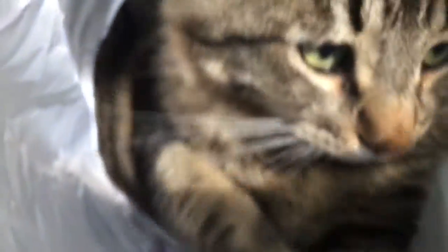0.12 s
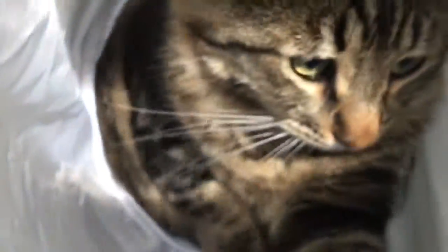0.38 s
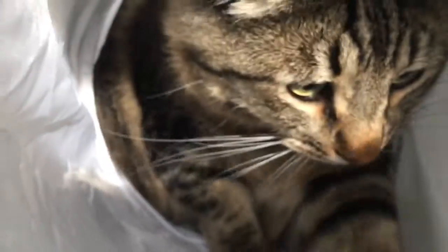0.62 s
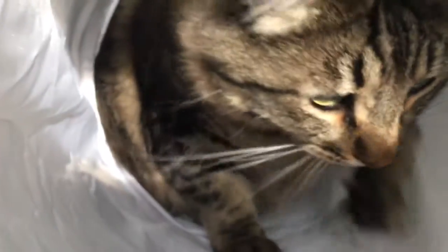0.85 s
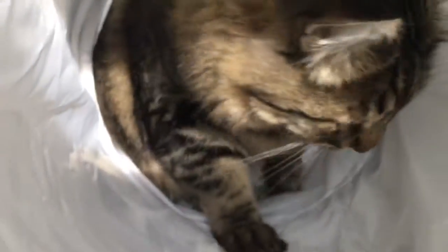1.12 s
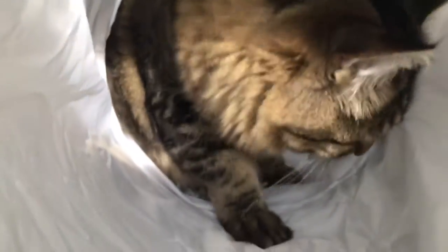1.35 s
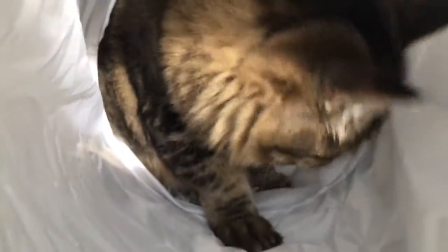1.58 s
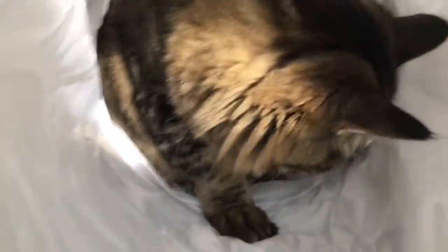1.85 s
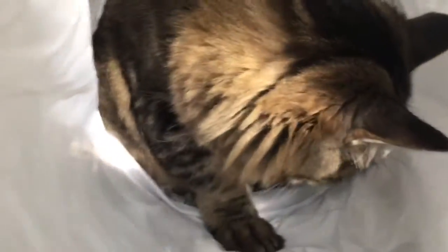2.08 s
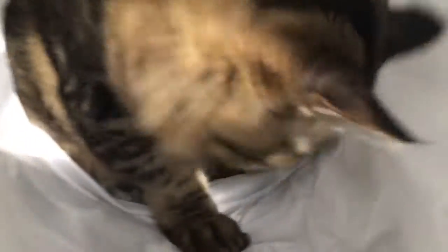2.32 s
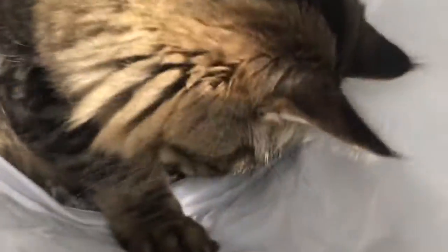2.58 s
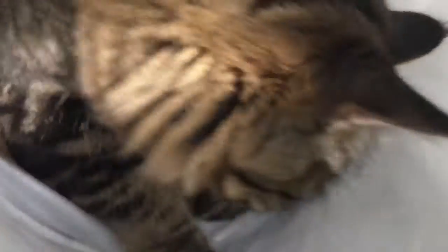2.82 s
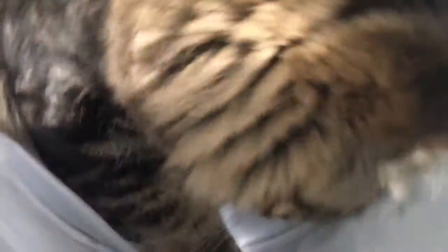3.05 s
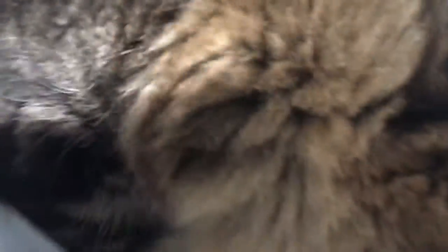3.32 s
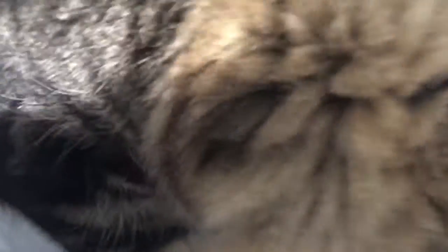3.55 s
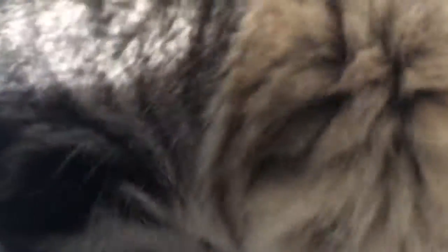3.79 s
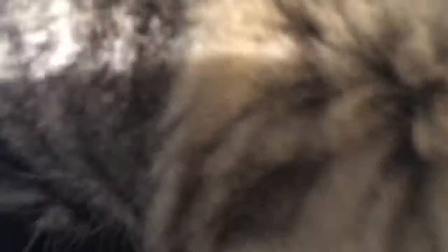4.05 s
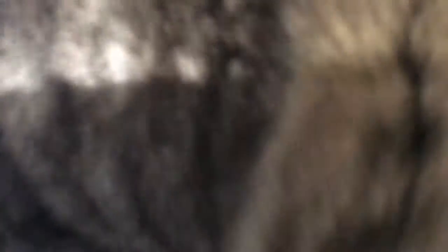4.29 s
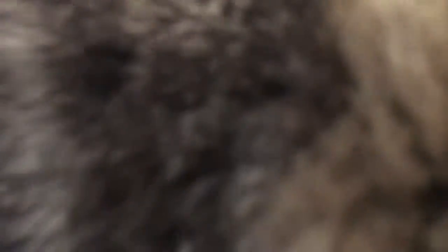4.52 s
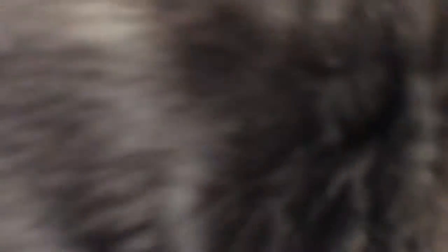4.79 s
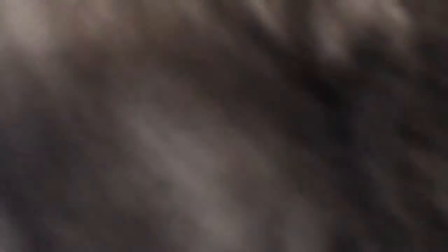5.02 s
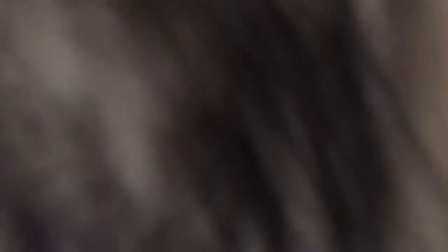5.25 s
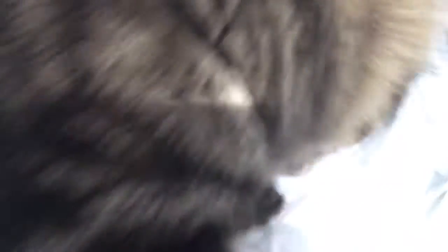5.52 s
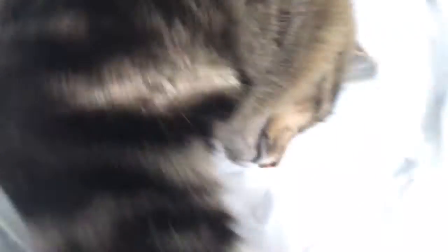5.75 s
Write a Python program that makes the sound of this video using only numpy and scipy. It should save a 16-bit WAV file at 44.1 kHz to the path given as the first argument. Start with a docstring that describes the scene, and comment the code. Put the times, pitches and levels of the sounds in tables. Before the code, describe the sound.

A cat moves inside a crinkly fabric tunnel in a quiet home, very close to a handheld phone. Crisp snaps and rustling come first, thin out to faint ticks after a second, return gently, then build into dense scraping, muffled rubbing and low thumps as the cat pushes past the microphone, with the hardest knocks near the end.

```python
"""Stiff film in a crinkly fabric tunnel snaps and crackles as a cat shifts a hand's width from a phone.
The cat then pushes past and brushes against the phone. Snaps are short bursts of filtered noise;
crackle, scrape and drag are noise gated by many small slips; a taut fold squeaks on a rising sine.
Bumps are damped low sines in the phone's body; filtered noise makes the handling rumble and the quiet home."""
import sys
import numpy as np
from scipy import signal
from scipy.fft import rfft, irfft
from scipy.io import wavfile
from scipy.ndimage import uniform_filter1d

SR = 44100
rng = np.random.default_rng(int(sys.argv[2]) if len(sys.argv) > 2 else 0)


def ratio(d):
    """dB to gain"""
    e = np.asarray(d, float) / 20
    return 10 ** e


def digitize_waveform(pressure):
    """Quantize a signal to 16-bit integers and store it at the path in sys.argv[1].

    Rows of a 2-D input are taken as channels; values are limited to [-1, 1].
    """
    field = np.atleast_2d(pressure).T
    bounded = np.clip(field, -1, 1)
    quanta = np.round(bounded * 32767).astype(np.int16)
    wavfile.write(sys.argv[1], SR, quanta)


N = 259308
GRAIN = 4096  # samples of noise for one snap

# tone of the quiet home: pitch_hz, relative_level_db
HOME_SPECTRUM = [(20, -23), (65, -1), (118, -3.5), (182, 6.5), (232, -4), (350, -3), (450, -28), (750, -19),
                 (5000, -38), (7500, -45), (16000, -52)]
# tone of the phone's handling rumble: pitch_hz, relative_level_db
RUMBLE_SPECTRUM = [(18, -32.5), (36, -10), (70, 0), (115, -5.5), (170, -9), (260, -9), (400, -15.5),
                   (900, -49.5)]
# tone of fur and cloth dragging: pitch_hz, relative_level_db
DRAG_SPECTRUM = [(200, -1.5), (400, -2), (1000, -0.5), (1600, -12), (3500, -40)]
# tone of taut cloth scraping: pitch_hz, relative_level_db
SCRAPE_SPECTRUM = [(800, -17), (1500, 5.5), (2200, 4), (4500, -1.5), (5400, -16)]
# tone of the stiff film: pitch_hz, relative_level_db
FILM_SPECTRUM = [(400, -10.5), (2000, 0), (6800, -1), (15500, -2)]
# response of the phone's microphone port, uneven in the treble and cut at the top: pitch_hz, gain_db
PORT_RESPONSE = [(3900, 0), (4850, 0.5), (5900, 3.5), (9300, 1.5), (10400, -1), (11800, 1), (15800, -2.5),
                 (16000, -32)]
# each shift of paw or flank, with the time to rise and to fall 20 dB:
# peak_s, rise_s, fall_s, crackle_db, scrape_db, drag_db
CAT_SHIFTS = [(0.0, .05, .2, -48, -46.5, -45), (.13, .03, .1, -54, -54, -48),
              (.355, .09, .035, -49, -44, -45), (.529, .22, .05, -39, -47.5, -41),
              (.633, .17, .06, -40, -50, -42.5), (.718, .08, .02, -56, -45.5, -49),
              (.903, .025, .022, -49, -51, -47), (.963, .04, .022, -60, -58, -47),
              (1.112, .04, .05, -64, -65, -63), (1.35, .5, .15, -76, -74, -64),
              (2.429, .1, .3, -68, -62, -59), (2.536, .1, .03, -45, -57, -51.5),
              (2.67, .015, .5, -75, -67, -62), (2.83, .07, .2, -54, -50, -57),
              (2.875, .15, .045, -51, -52, -56), (2.998, .008, .2, -53, -52, -50.5),
              (3.038, .1, .08, -60, -48, -52), (3.135, .1, .025, -57, -50, -49),
              (3.218, .1, .03, -70, -55, -60), (3.43, .09, .045, -56, -45, -48),
              (3.53, .15, .08, -67, -59, -56), (3.66, .04, .2, -74, -58, -53),
              (3.725, .04, .25, -51, -44, -46), (3.83, .08, .04, -52, -46, -41),
              (3.918, .08, .04, -50, -40, -46), (4.031, .17, .06, -52, -47, -40.5),
              (4.13, .1, .1, -61, -54, -54), (4.335, .05, .03, -59, -48.5, -50),
              (4.388, .003, .2, -54, -48, -40), (4.421, .04, .035, -34, -37.5, -38),
              (4.48, .15, .07, -47, -40, -32), (4.58, .2, .1, -62, -46, -46),
              (4.71, .025, .15, -48.5, -48, -38), (4.85, .15, .08, -42, -35, -30),
              (5.03, .2, .1, -41, -42, -35), (5.083, .012, .18, -27, -32, -24.5),
              (5.243, .3, .16, -32.5, -35, -27.5), (5.37, .08, .08, -42, -50, -34),
              (5.507, .03, .025, -34.5, -48, -31), (5.592, .05, .15, -40.5, -46, -36),
              (5.77, .14, .3, -39, -33, -35), (5.877, .3, .1, -39, -40, -38)]
# between the shifts, with the rumble that a shift adds relative to its drag:
# start_s, settling_cloth_db, hand_rumble_db, rumble_above_drag_db
CAT_UNREST = [(0, -63, -46, -1), (.22, -70, -46, -1), (.45, -62, -48, -1), (.7, -62, -48, -2),
              (.8, -67, -56, 0), (1.0, -70, -54, 0), (1.45, -77, -60, 0), (1.78, -83, -64, 0),
              (2.15, -80, -55, 0), (2.62, -88, -60, 6), (3.0, -80, -58, 3), (3.4, -70, -49, 0),
              (3.6, -84, -60, 3), (3.8, -60, -42, 2), (4.05, -62, -46, 2), (4.2, -68, -60, 4),
              (4.45, -70, -50, 9), (4.65, -70, -54, 0), (5.0, -52, -40, 3), (5.4, -44, -36, -2),
              (5.62, -52, -30, 3), (5.88, -50, -48, -3)]
# settling cloth, one value each for crackle, scrape and drag: relative_level_db
SETTLING_MIX = [-3, -1, 1]
# bumps against the phone, level before damping: start_s, level_db, pitch_hz
PHONE_BUMPS = [(0.041, -33, 150), (0.142, -33, 153), (0.29, -31, 170), (0.972, -32, 147), (1.698, -44, 170),
               (3.031, -31, 152), (3.21, -34, 72.6), (3.684, -25, 267), (3.73, -27.5, 248),
               (3.781, -23, 120), (3.809, -26.5, 202), (3.91, -21, 113), (3.999, -21, 112),
               (4.034, -25, 189), (4.297, -30.5, 136), (4.397, -21.5, 200), (4.446, -19.5, 108),
               (4.464, -21, 227), (4.492, -18, 153), (4.699, -30, 210), (4.868, -15.5, 179),
               (5.047, -21, 198), (5.066, -16, 150), (5.078, -13, 120), (5.09, -11, 95), (5.108, -12, 62),
               (5.383, -18, 260), (5.501, -11, 167), (5.509, -3.5, 73), (5.498, -11, 600),
               (5.577, -14, 100), (5.578, -4, 720), (5.651, -17.5, 110), (5.802, -16.5, 208)]
# a fold squeaks upward as it is pulled tight: time_s, pitch_hz, level_db
FOLD_SQUEAK = [(4.417, 1200, -27), (4.424, 1544, -26.5), (4.431, 2130, -23), (4.437, 2130, -48)]
# creases that snap singly; body (to 1.5 kHz) and top (from 8 kHz) are relative to the middle:
# start_s, level_db, body_db, top_db, nominal_length_ms
SINGLE_SNAPS = [(0.0041, -36, 3, -6, 2.3), (0.0487, -35, 2, 1, 2.5), (0.0538, -34, -2, -8, 2.5),
                (0.0868, -37, 16.5, -12, 3.5), (0.136, -36, 7, 5, 4.2), (0.2005, -39, 5, 2, 2.1),
                (0.269, -45, 0, 11, 2.5), (0.2939, -41.5, -1, 11, 2.6), (0.311, -41, 6, -5, 4),
                (0.3943, -35, 11.5, 5, 10.5), (0.5038, -31, -1, -9, 3.9), (0.901, -36, 2, -5, 6.1),
                (2.7136, -43, 2, -9, 3.9), (2.724, -43, 4, -1, 3.7), (2.8213, -37, -2, -11, 4.6),
                (3.138, -36.5, -1, 3, 5), (3.8783, -30, 8, -5, 1.2), (4.7951, -28, 17, -2, 3.7),
                (4.8313, -26, 9, 4, 3.3), (4.922, -26, 7, -4, 2.8), (5.015, -26, 16, 5, 4.3),
                (5.3024, -25, 12, 4, 4.8), (5.3505, -32, 3.5, 10, 5.7), (5.4869, -22.5, 19, -17, 2.4),
                (5.5616, -29, 27, -8, 3.3), (5.6862, -31, 3, 8, 7.2), (5.8491, -25, 15, 16, 6),
                (0.017, -34, 1.5, -7.5, 5.7), (0.0366, -34, 24, -8, 5.2), (0.066, -29, 6, -5, 2.8),
                (0.0992, -36.5, -16, -2, 2.4), (0.1268, -35.5, -1, -5, 9), (0.163, -15.5, 2, 5, 2.5),
                (0.1799, -30, 11, -6, 2.7), (0.1921, -33, -6, -8, 3.8), (0.2434, -40.5, 7.5, -9, 3.4),
                (0.2487, -32, 9.5, -4, 2), (0.2577, -33, 12, -9, 3.6), (0.2857, -26, -9.5, -15.5, 1.9),
                (0.324, -35, 1, 0, 3.5), (0.3415, -29.5, -1, -6, 2.2), (0.3518, -29.5, 3.5, 3, 1.9),
                (0.3619, -29, -4, -3, 2.3), (0.4152, -30, 20, 7, 2.1), (0.444, -31, 5, 1, 5.6),
                (0.5278, -25, -8, 9, 3.6), (0.5477, -23.5, 8, 3, 2.4), (0.5559, -24, -9, -2, 2.3),
                (0.577, -29, 7, 1, 4.4), (0.5939, -28, -14, -5, 2.3), (0.6138, -17, -3, 12, 1.4),
                (0.637, -25, 4.5, 1, 6.3), (0.6646, -30, -6, 5, 2.7), (0.6936, -27.5, 0, -1.5, 4.2),
                (0.7107, -27.5, -3, -1, 3.7), (0.7174, -30, -3.5, -3, 5.6), (0.7523, -36, -10.5, -2, 3.3),
                (0.7741, -31.5, 15, 5, 3.4), (0.79, -40, 18, -1, 2.8), (0.8312, -35, -0.5, -9, 2.2),
                (0.8408, -35, -5, 4, 3.1), (0.8627, -41, 3.5, -6, 7.4), (0.8953, -32, -13, -7, 3.9),
                (0.909, -32, -4, -1, 3), (0.9391, -39, -9, -6, 3), (0.9493, -39, 6.5, -6, 2.5),
                (0.9551, -34.5, -2, -8, 1.9), (0.9646, -30.5, -7.5, -3, 5.3), (0.9977, -41.5, -11, -1, 3.2),
                (1.0145, -41.5, 0, -5, 3.2), (1.045, -44.5, -8, -10, 3.7), (1.0735, -24.5, 4.5, 9, 1.9),
                (1.1, -39, 2, -3, 5.8), (1.1037, -36, 5, -1, 2.2), (1.1201, -27, 13, 18, 3.3),
                (1.18, -33, 16, 11, 1.1), (1.2342, -47, 7, -7, 4.2), (1.3405, -51, 10, -2, 4.9),
                (1.4203, -48, -2, 0, 3.2), (1.4319, -35.5, 0, -8, 3.1), (1.5033, -52, 13, -5, 5.5),
                (1.7078, -47.5, 12, -7, 8.1), (1.8202, -45.5, 15, 2.5, 3.5), (1.8398, -51, 23.5, -17, 3.4),
                (1.8703, -45, -7, 1, 1.5), (2.014, -37.5, -3, -9, 2.3), (2.0756, -46.5, -1, -25, 1.5),
                (2.3231, -52, 1, -8, 2.3), (2.3971, -40.5, 10, -2, 2.6), (2.4246, -39, -4, -9, 4.3),
                (2.4306, -36.5, 13, -7, 2.3), (2.4548, -37, 9, 4, 4.9), (2.4735, -39, 0, 12, 1.8),
                (2.5334, -34, -1, -1, 2.7), (2.5578, -37, 10, 0, 2.9), (2.5862, -31, 0, -3.5, 5.5),
                (2.6376, -46, -7, 14, 2.1), (2.6566, -37.5, -4, -6, 3.4), (2.6671, -36.5, 10, 6, 2.3),
                (2.6951, -31, 3.5, 4, 4), (2.745, -37.5, 8, -7, 3), (2.7808, -35, -3, -21, 2.9),
                (2.8095, -33, 21, -10, 1.4), (2.8646, -31.5, 1, -3, 2.4), (2.9067, -37, 3, 0, 3.3),
                (2.9192, -36, 20, 2, 3.1), (2.926, -40, 19, 0, 3.8), (2.9915, -42, -8, -4, 4.1),
                (2.9556, -51, -4, -15, 4.4), (3.0319, -31.5, 13, 9.5, 5), (3.0587, -38, -6, 4, 3.5),
                (3.087, -38, 5, -21, 2.1), (3.1018, -39.5, 5, -22, 5.1), (3.1344, -32, -3, 4, 2.3),
                (3.205, -33, -3, -16, 2.6), (3.217, -32.5, -4, 0, 3.2), (3.2675, -46, -3, -7, 4.7),
                (3.316, -39.5, 11, -8, 2.2), (3.4138, -38, 3, -2, 5.4), (3.4251, -31, 6, -1, 2.7),
                (3.557, -39, 6, -14, 2.4), (3.5674, -36.5, 11, 2, 2), (3.5803, -44, -2, -1, 3.3),
                (3.6396, -49, 23, -3, 3.3), (3.7146, -26.5, 12.5, -9, 1.8), (3.7281, -21.5, 3, -14, 3.2),
                (3.7606, -29.5, 10, 0, 2.9), (3.8273, -32.5, 5.5, -2, 4.9), (3.8347, -27, 3, -14, 3.5),
                (3.8884, -26, 8, -7, 1.5), (3.9162, -26, 5, 6, 2.3), (3.9899, -32, 19, -17, 3),
                (3.9964, -35.5, 7, -2, 4.6), (4.0309, -20.5, 18, -9, 2.2), (4.0365, -21, 7, -8.5, 3.7),
                (4.0724, -35.5, 9, -22, 1.9), (4.2084, -50, -5, 4, 2), (4.2817, -46.5, 4, 17, 2.4),
                (4.3208, -32, 22, 11, 2.8), (4.426, -25, 7.5, -5.5, 11), (4.4774, -26, 2, 14, 2.1),
                (4.4912, -19.5, 16, -10, 2.8), (4.4996, -19, 5, -0.5, 2), (4.6502, -40.5, -14, -3, 9.5),
                (4.7224, -27, 22.5, 1, 3), (4.7651, -27.5, 17, 9, 2.3), (4.8213, -17.5, 6, -2, 1.9),
                (4.869, -18.5, 15, -16, 1.7), (4.941, -22, 4, -13, 2.1), (4.9903, -24.5, 15.5, 8, 6.5),
                (5.0294, -19, 2, -5, 2.5), (5.037, -20.5, -4, -12.5, 1.8), (5.4168, -23, 17.5, 2, 2.9),
                (5.447, -23.5, -9, 0, 2.8), (5.4755, -19, 28, -15, 1.1), (5.4985, -15, 11.5, 3.5, 2.8),
                (5.5502, -28, -5, -9, 2.4), (5.5785, -16, 20, 0, 1.5), (5.6455, -27, 19, 1.5, 8),
                (5.6712, -25, 8, -12, 2.1), (5.7135, -30, 0, -25, 2.9), (5.7471, -19.5, 9, 3.5, 1.9),
                (5.78, -24, 16, -3, 8), (5.798, -17, 0, 10, 3.3)]


def colour(x, points):
    """Filter by a spectrum of (Hz, dB) points; the result has rms 1."""
    hz, db = np.transpose(points)
    bins = np.fft.rfftfreq(len(x), 1 / SR) + 1
    gain = ratio(np.interp(np.log(bins), np.log(hz), db))
    y = irfft(rfft(x) * gain, len(x))
    return y / np.sqrt(np.mean(y ** 2))


def walk(rate):
    """Random levels held 1 / rate s and slewed twice; spread near 1."""
    k = int(SR / rate)
    held = np.repeat(rng.standard_normal(N // k + 1), k)
    return 0.88 * uniform_filter1d(uniform_filter1d(held, k), k)[:N]


def add(out, s, grain):
    """Mix a grain in at time s."""
    i = max(int(s * SR), 0)
    out[i:i + len(grain)] += grain[:len(out) - i]


def power_sum(levels_db):
    """Level of unrelated sounds together."""
    return 10 * np.log10(np.sum(ratio(2 * np.array(levels_db)), axis=0))


def swell(t, length_s):
    """A crease gives way quickly and dies a little slower; peak 1."""
    return t / length_s * np.exp(1 - t / length_s)


def creases(per_s, spread_db, length_s, hiss_db):
    """Level over time of many small slips of uneven size above an even hiss; rms near 1."""
    sizes = ratio(spread_db * np.clip(rng.standard_normal(N), -3, 1.6))
    slips = (rng.random(N) < per_s / SR) * sizes
    envelope = np.convolve(slips, swell(np.arange(400) / SR, length_s))[:N]
    envelope = envelope / np.sqrt(np.mean(envelope ** 2))
    return (envelope + ratio(hiss_db)) / np.sqrt(1 + ratio(2 * hiss_db))


def movement():
    """Levels of crackle, scrape, drag and rumble: every shift rises and falls over the unrest."""
    rumble_steepness = 1.3  # the rumble rises and falls this much faster than the drag
    t = np.arange(0, N, 32) / SR
    s, *columns = np.transpose(CAT_UNREST)
    cloth_db, hand_db, shake_db = (np.interp(t, s, c) for c in columns)
    peak_s, rise_s, fall_s, *layers = np.transpose(CAT_SHIFTS)[:, :, None]
    slope_db = -20 * np.maximum((peak_s - t) / rise_s, (t - peak_s) / fall_s)
    levels = []
    for layer_db, settle_db in zip(layers, SETTLING_MIX):
        shifts_db = power_sum(layer_db + slope_db)
        levels.append(power_sum([shifts_db, cloth_db + settle_db]))
    shaken_db = power_sum(layers[-1] + rumble_steepness * slope_db) + shake_db
    levels.append(power_sum([shaken_db, hand_db]))
    return [np.interp(np.arange(N) / SR, t, v) for v in levels]


def home():
    """A quiet home rumbles underneath as steady, mostly low noise."""
    return ratio(-59) * colour(rng.standard_normal(N), HOME_SPECTRUM)


def rumble(level_db):
    """Low noise of the hand-held, shaken phone, its level wavering quickly."""
    waver_db = 4.0 * np.clip(walk(45), -1.5, 2.5)
    return colour(rng.standard_normal(N), RUMBLE_SPECTRUM) * ratio(level_db + waver_db)


def bumps():
    """Each bump is a damped swing of the phone's body."""
    cycles = 5.2  # swings until a bump is 60 dB down
    out, t = np.zeros(N), np.arange(2 * GRAIN) / SR
    signs = rng.choice([-1, 1], len(PHONE_BUMPS))
    for (s, level_db, hz), sign in zip(PHONE_BUMPS, signs):
        decay = ratio(level_db - 60 * t * hz / cycles)
        add(out, s, sign * decay * np.sin(2 * np.pi * hz * t))
    return out


def squeak():
    """A fold pulled tight gives a short, rough rising tone."""
    s, hz, db = np.transpose(FOLD_SQUEAK)
    t = np.arange(N) / SR
    roughness_db = 3 * walk(700)
    level_db = np.interp(t, s, db, left=-200, right=-200) + roughness_db
    phase = 2 * np.pi * np.cumsum(np.interp(t, s, hz)) / SR
    return ratio(level_db) * np.sin(phase)


def drag(level_db):
    """Fur slides in longer, softer catches, more evenly as it gets louder."""
    slips = creases(250, 2.8, 0.0014, hiss_db=-1.5 + 0.2 * (level_db + 45.5))
    return colour(rng.standard_normal(N), DRAG_SPECTRUM) * slips * ratio(level_db)


def scrape(level_db):
    """Taut cloth slips in gritty catches, more evenly the harder it is pulled."""
    slips = creases(450, 3.1, 0.0014, hiss_db=-5.5 + 0.33 * (level_db + 38.5))
    return colour(rng.standard_normal(N), SCRAPE_SPECTRUM) * slips * ratio(level_db)


def crackle(level_db):
    """Tiny creases gate the film's bright noise; under a hard shove they merge into a hiss."""
    slips = creases(400, 3.7, 0.00066, hiss_db=-2 + 0.47 * (level_db + 44))
    return colour(rng.standard_normal(N), FILM_SPECTRUM) * slips * ratio(level_db)


def catches():
    """The cloth catches and lets go: a quick random gain of rms 1."""
    gain = ratio(1.8 * walk(90))
    return gain / np.sqrt(np.mean(gain ** 2))


def snap(noise, patch, body_db, top_db, length_ms):
    """One crease buckles: a noise burst with a patchy spectrum, and a faint short tail from the tunnel."""
    t = np.arange(len(noise)) / SR
    spectrum = [(200, body_db - 1), (600, body_db), (1500, body_db),
                (3500, 0.0046), (8000, top_db), (16000, top_db)]
    patches = list(zip(np.geomspace(300, 16000, len(patch)), 1.5 * patch))
    envelope = swell(t, 0.00033 * max(length_ms - .6, .4))
    burst = colour(colour(noise, spectrum), patches) * envelope
    burst = burst * np.sqrt(np.sum(envelope ** 2) / np.sum(burst ** 2))
    tail_db = -26 + top_db / 2 - 60 * t / 0.044  # falls 60 dB in 44 ms
    tail = noise[::-1] * ratio(tail_db) * np.minimum(t / 0.0017, 1)
    return burst + tail


def small_snaps(rustle_db):
    """Lesser creases give way at random, a little above the rustle, each with its own tint and length."""
    count, above_db, cap_db, spread_db = 90, 9, -30, 3  # the cap acts before the random spread
    out = np.zeros(N)
    times = rng.random(count) * N / SR
    chance = rng.standard_normal((count, GRAIN + 24 + 4))
    for s, row in zip(times, chance):
        size, body, top, length = row[-4:]
        level_db = min(rustle_db[int(s * SR)] + above_db, cap_db) + spread_db * size
        length_ms = 3 * ratio(3 * length)
        grain = snap(row[:GRAIN], row[GRAIN:-4], 5 + 8 * body, -5 + 8 * top, length_ms)
        add(out, s, ratio(level_db) * grain)
    return out


def snaps():
    """The creases that one hears singly, each buckling at its own time."""
    out = np.zeros(N)
    chance = rng.standard_normal((len(SINGLE_SNAPS), GRAIN + 24))
    for (s, level_db, body_db, top_db, length_ms), row in zip(SINGLE_SNAPS, chance):
        grain = snap(row[:GRAIN], row[GRAIN:], body_db, top_db, length_ms)
        add(out, s, ratio(level_db) * grain)
    return out


def scene():
    """Movement sets the level of crackle, scrape, drag and rumble; snaps and bumps stand out of them."""
    crackle_db, scrape_db, drag_db, rumble_db = movement()
    background = home() + rumble(rumble_db)
    rustle = catches() * (crackle(crackle_db) + scrape(scrape_db))
    cloth = rustle + drag(drag_db) + squeak()
    lesser = small_snaps(power_sum([crackle_db, scrape_db]))
    return (background + bumps() + cloth + lesser + snaps())[None]


def low_pass(x):
    """Removes everything above the highest recorded frequency."""
    return signal.sosfilt(signal.butter(12, 16970, fs=SR, output="sos"), x)


def record(dry):
    """The port in front of the phone's microphone colours the treble and cuts the top."""
    hz, db = np.transpose(PORT_RESPONSE)
    gain = ratio(np.interp(np.fft.rfftfreq(N, 1 / SR), hz, db))
    mix = irfft(rfft(dry) * gain, N)
    return low_pass(mix)


dry = scene()
out = record(dry)
digitize_waveform(out)
```